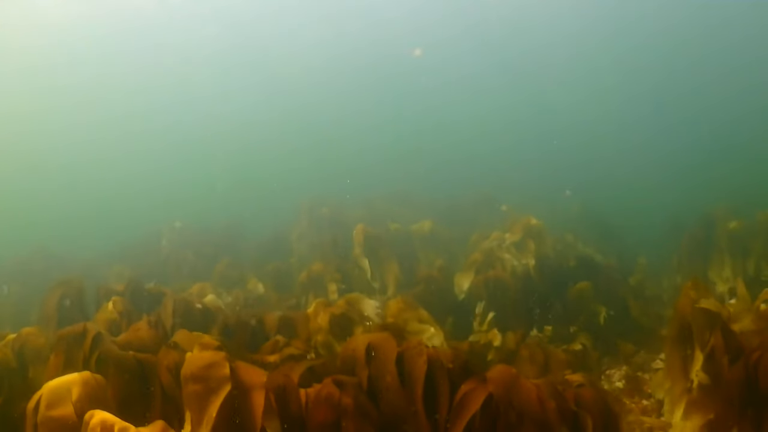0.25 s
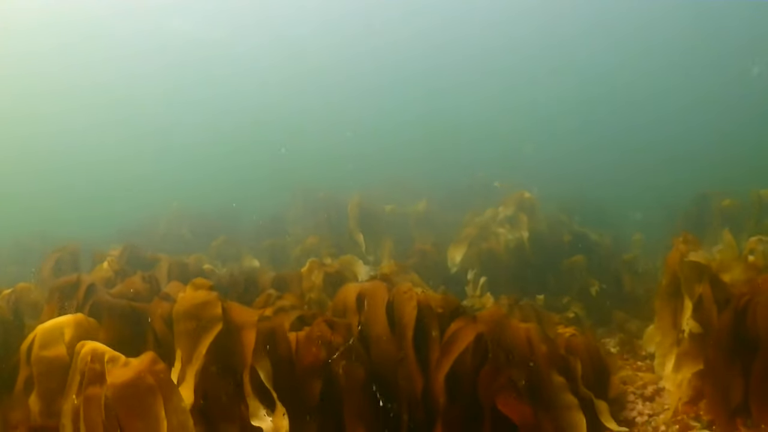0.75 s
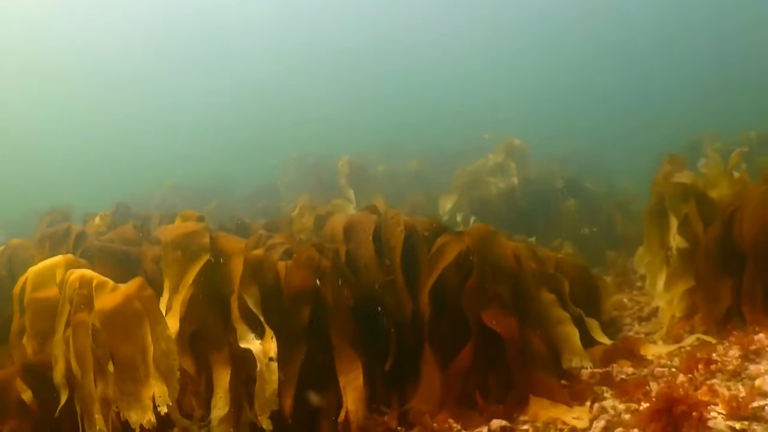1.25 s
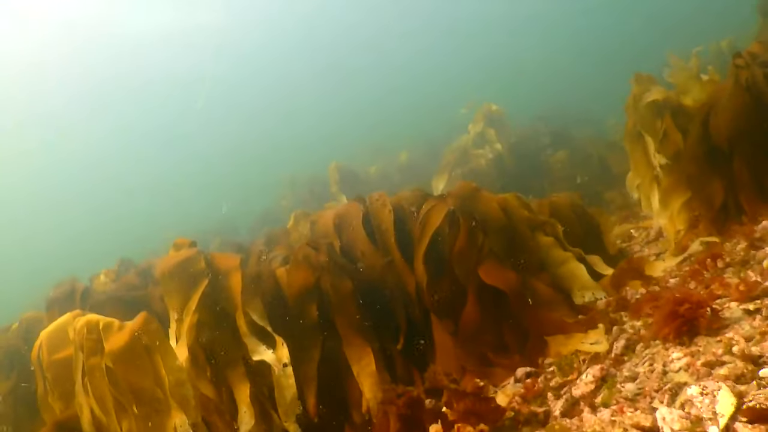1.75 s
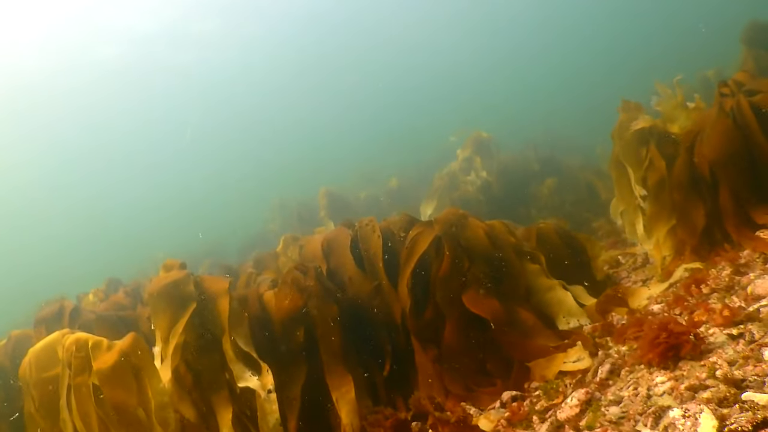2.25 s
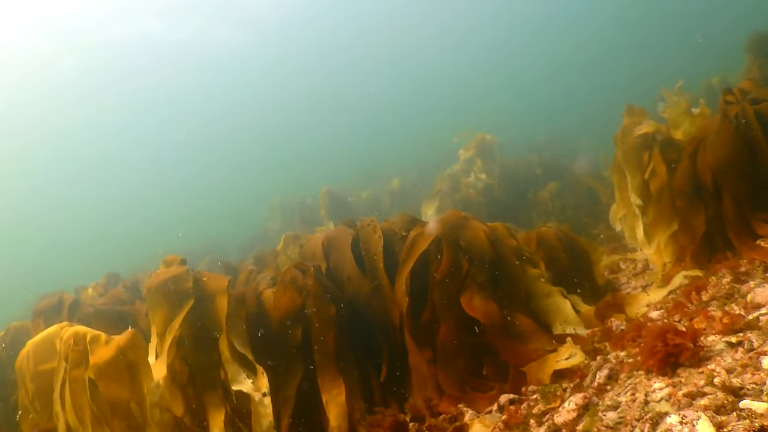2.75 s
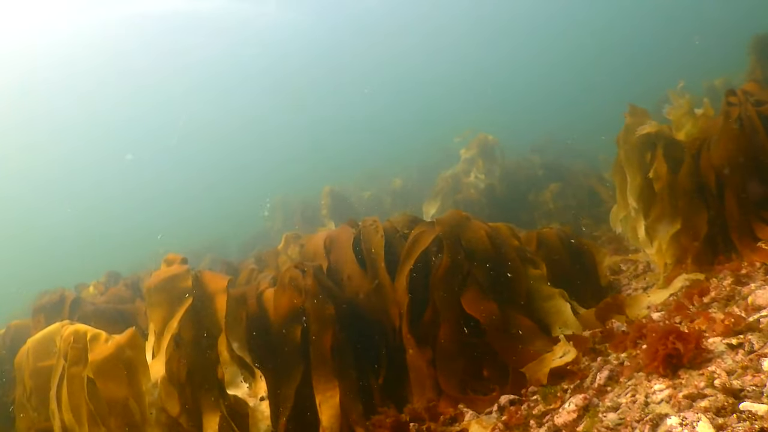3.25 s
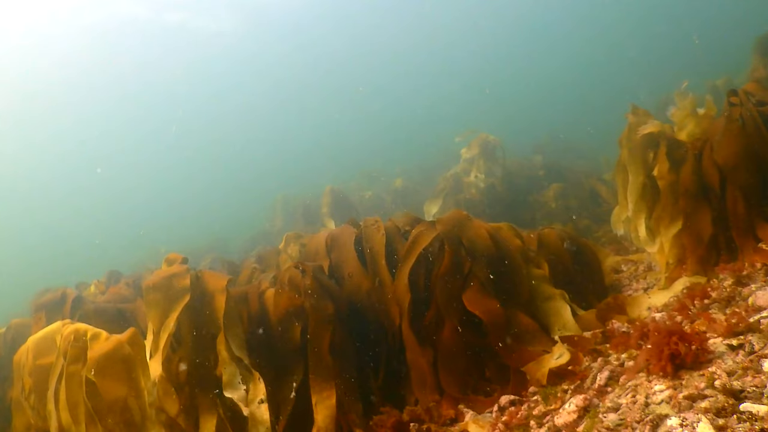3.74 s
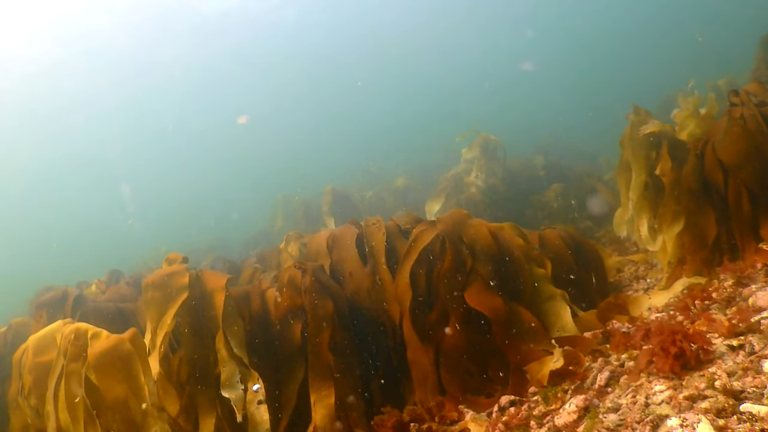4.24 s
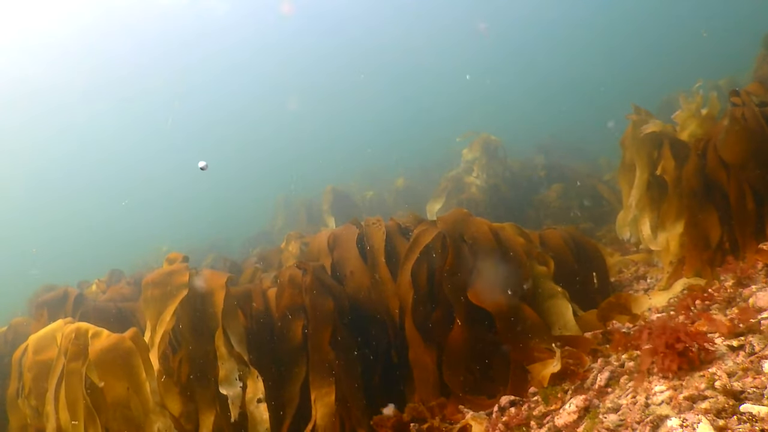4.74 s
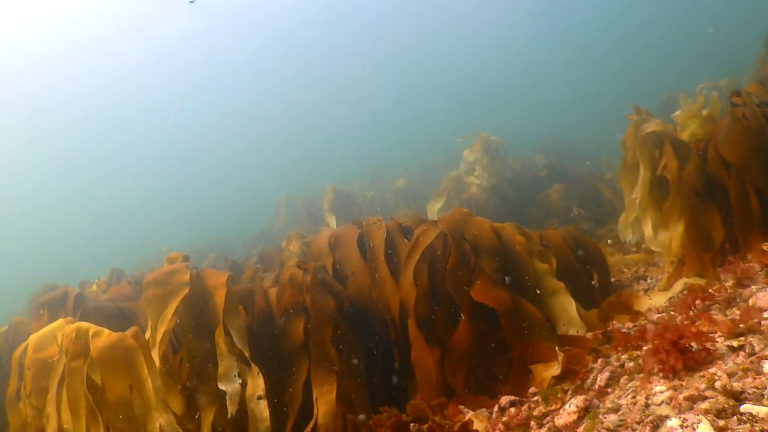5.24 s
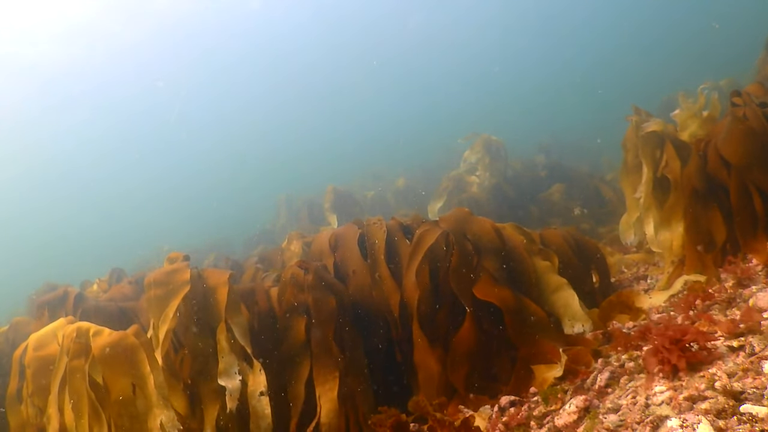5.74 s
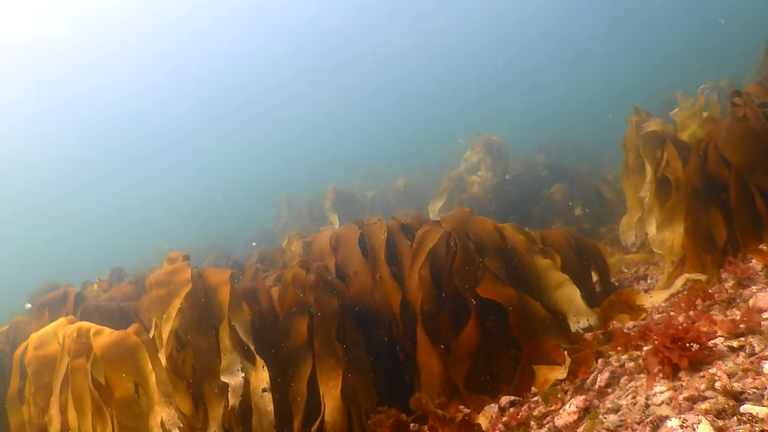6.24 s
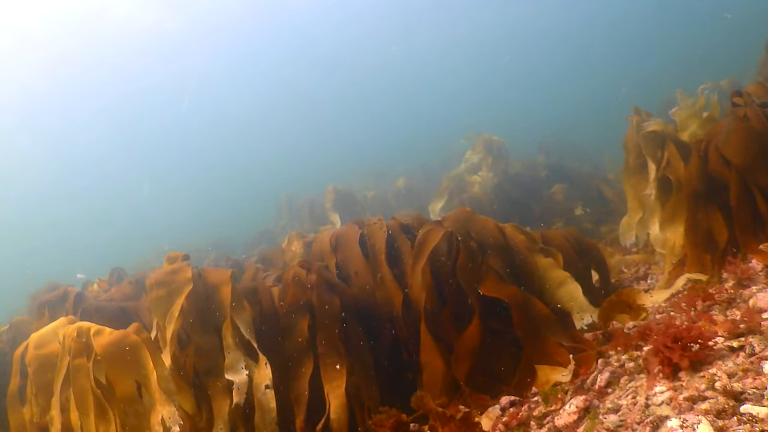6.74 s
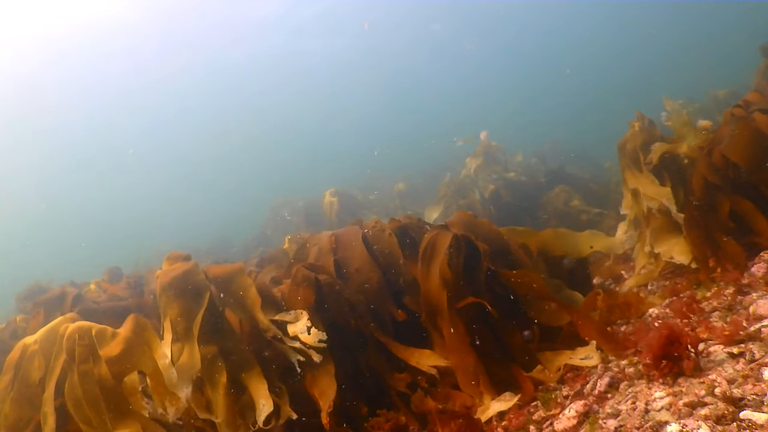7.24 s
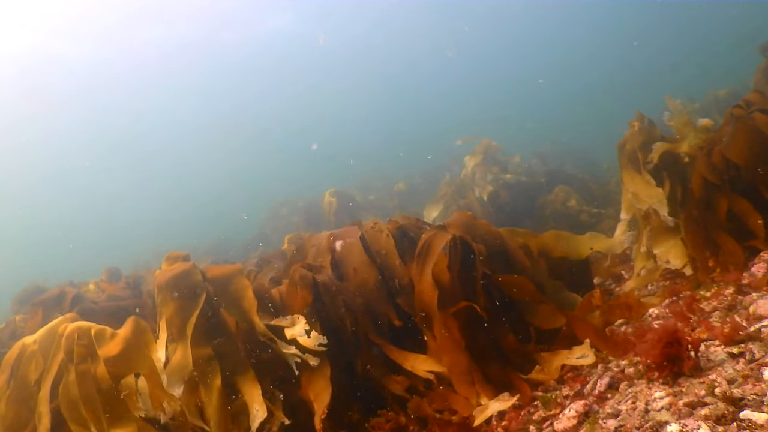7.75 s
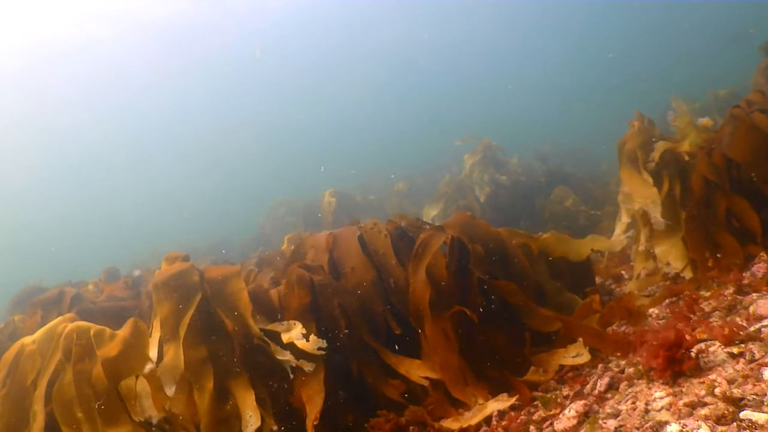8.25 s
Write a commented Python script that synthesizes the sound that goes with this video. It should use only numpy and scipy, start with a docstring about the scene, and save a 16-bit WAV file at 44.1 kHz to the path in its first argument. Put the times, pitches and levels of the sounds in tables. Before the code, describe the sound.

A boat engine is heard underwater from the start, thumping about seven times a second over a clattering drone, with two shrill rasps per beat and a very faint, thin whine. Scattered dull knocks and bubbles sound close to the microphone housing. At about 1.9 seconds a cluster of knocks and a booming bump end in a very loud, sharp click at 2 seconds. Everything ducks, then swells back over the next two seconds. The engine carries on with somewhat stronger thumps, occasional knocks and bright ticks, and a low surge of water around 4.2 seconds. Just before 7 seconds the sound drops to silence for a tenth of a second. It returns without the engine: quieter water gurgles, ticks and crackles close by over faint hiss until about 8.5 seconds. The left side carries the detail; the right is muffled, mostly bass.

```python
"""A boat engine heard under water, from a camera in a sealed housing above a kelp bed.
It thumps seven times a second over a clattering drone, with two shrill rasps a cycle and a thin whine.
Right at the microphones, knocks and a booming bump on the housing end in a sharp click that ducks
the gain for two seconds. After a short silence the engine is gone: water gurgles and ticks close by.
The left microphone hears it all; the right one is muffled and gets little but the bass."""
import sys
import numpy as np
from scipy import signal
from scipy.fft import rfft, irfft
from scipy.io import wavfile

SR = 44100
rng = np.random.default_rng(int(sys.argv[2]) if len(sys.argv) > 2 else 0)


def persist_wave(psi):
    """Save psi, clipped to +-1, as 16-bit WAV."""
    counts = np.round(np.clip(psi, -1, 1) * 32767).astype(np.int16)
    wavfile.write(sys.argv[1], SR, np.atleast_2d(counts).T)


N = 374409
TIME = np.arange(N) / SR
HZ = np.fft.rfftfreq(N, 1 / SR)
FIRST_STROKE_S, CYCLE_S, ENGINE_GONE_S = 0.0865, 0.14115, 7.0
BAND_LIMIT_HZ = 15550

# What the engine's heavy stroke rings. Each row: pitch in Hz, gain in dB, seconds to fall 60 dB.
THUMP_MODES = [(265, -18, .07), (328, -4, .085), (445, -5.5, .05), (630, -3, .04), (1050, -10, .015)]
# How strongly the thumps come through the water. Each row: time in seconds, relative level in dB.
THUMP_LEVELS = [(0.1, -27.5), (0.7, -27.5), (1.1, -23), (2.3, -24.5), (2.7, -21), (3.55, -18), (4.0, -18.5),
                (4.35, -16.5), (5.0, -21), (5.85, -19.5), (6.8, -22)]
# The idle wavers, so strokes come early or late. Each row: time in seconds, delay in seconds.
STROKE_DELAYS = [(0.3, 0), (0.9, 0), (1.2, -.0048), (1.5, .0007), (1.8, 0), (2.06, -.005), (2.35, .001),
                 (2.9, .0035), (3.45, 0), (3.65, -.0044), (4.04, -.0024), (4.2, .0035), (4.6, .0027),
                 (5.03, -.002), (5.3, .002), (5.9, 0), (6.25, -.0035), (6.75, .0014)]
# Resonances of the rasp. Each row: centre in Hz, width in Hz, gain in dB, change in dB at full surge.
RASP_MODES = [(2010, 1900, -8, 3.5), (3135, 85, 0, 8), (3305, 73, -2.5, 7), (3428, 51, 6, -6),
              (3630, 194, 2.5, -4), (3910, 610, -4, -12), (4280, 71, -1.5, -2), (4500, 620, -8.5, -3)]
# How strongly the rasps reach the camera. Each row: time in seconds, relative level in dB.
RASP_LEVELS = [(0.2, -34), (1.2, -35), (3.3, -34.5), (4.1, -37), (5.5, -36.5), (6.8, -38)]
# Housing resonances that colour the drone. Each row: centre in Hz, width in Hz, then gain in dB
# at first, near the kelp, once the camera has turned, and with the engine gone.
HOUSING_MODES = [(335.8, 30, -8, -6.5, 2, -6), (484, 100, -12.5, -6.5, -2.5, -19), (562, 91, 0, -2, 0.5, 6),
                 (692, 71, -2, -11.5, -0.5, 6.5), (820, 200, -9.5, -6.5, -11.5, -2.5),
                 (1022.6, 115, -6.5, 2.5, 0.5, 0.5), (1092, 61, -3, -2, 2, -1),
                 (1176, 110, -3.5, -4.5, -2.5, -17), (1360, 78, -23, -20.5, -8.5, -9),
                 (1511, 150, -9.5, -11.5, -2.5, -3), (1706, 350, -18, -17, -11.5, -11.5),
                 (2195, 54, -11.5, -12, -12, -9), (2406, 480, -20, -20.5, -20, -20),
                 (3480, 1140, -18, -19, -18.5, -15.5), (4130, 380, -18.5, -24, -18.5, -11.5),
                 (5120, 960, -23.5, -24.5, -21.5, -16)]
# The drone, a faint wash once the engine is gone. Each row: time in seconds, relative level in dB.
DRONE_LEVELS = [(0, -32.5), (0.9, -32), (1.3, -31), (2.2, -28), (2.8, -31.5), (3.6, -30), (4.8, -31.5),
                (6.93, -32.5), (7.05, -43), (8.45, -45.5)]
# Dull knocks and gurgles on the housing.
# Each row: start in seconds, peak in dB, centre in Hz, length of the scatter in seconds.
HOUSING_KNOCKS = [(0.471, -10.5, 1100, 0.0017), (0.594, -14, 900, 0.001), (0.618, -16, 520, 0.0075),
                  (0.955, -17, 1400, 0.0013), (1.256, -17, 1300, 0.0011), (1.289, -19, 1030, 0.001),
                  (1.33, -21, 1010, 0.011), (1.366, -19, 1050, 0.005), (1.585, -15.5, 1060, 0.0041),
                  (1.886, -15, 1200, 0.0057), (1.912, -6, 1030, 0.0084), (1.937, -16, 1200, 0.008),
                  (1.95, -15, 1300, 0.014), (1.995, -0.5, 2400, 0.003), (2.566, -12, 835, 0.0026),
                  (4.104, -13.5, 670, 0.0046), (4.122, -22.5, 650, 0.023), (4.401, -18, 564, 0.0089),
                  (4.506, -22, 280, 0.0081), (5.247, -16, 716, 0.0017), (6.434, -19, 680, 0.0027),
                  (6.481, -10, 1030, 0.0022), (7.052, -28, 990, 0.0065), (7.101, -23.5, 536, 0.0185),
                  (7.167, -24, 647, 0.002), (7.233, -33, 890, 0.019), (7.289, -24, 860, 0.022),
                  (7.453, -27.5, 814, 0.013), (7.479, -27.5, 650, 0.012), (7.54, -23, 557, 0.0061),
                  (7.571, -24.5, 760, 0.006), (7.638, -35, 397, 0.0041), (7.676, -29, 700, 0.002),
                  (7.764, -35, 650, 0.002), (7.687, -16, 700, 0.02), (7.813, -27.5, 825, 0.022),
                  (7.881, -28.5, 750, 0.024), (8.053, -27, 668, 0.001), (8.076, -24.5, 850, 0.0066),
                  (8.129, -27, 830, 0.019), (8.17, -18, 614, 0.018), (8.334, -27, 815, 0.0027),
                  (8.383, -25, 760, 0.004), (8.399, -25, 700, 0.016)]
# What knocks and gurgles ring. Each row: centre in Hz, width in Hz, gain in dB.
KNOCK_RESONANCES = [(88, 27, -35), (147, 63, -4), (251, 110, -2), (347, 61.5, 6), (443.4, 130, 5),
                    (707, 180, 3.5), (895, 118, -6), (1045, 270, -1.5), (1396, 350, -3.5),
                    (2390, 1300, -23)]
# The housing's lowest resonances. Each row: centre in Hz, width in Hz, gain in dB.
BOOM_MODES = [(85, 18, 3), (132, 49, 2), (192, 48, -3.5), (286, 77, 4.5), (475, 110, -5.5)]
# The sharp click and its bounce. Each row: start in seconds, peak in dB ahead of the limiter.
CLICK_HITS = [(1.9772, 19.5), (1.98, 16.5)]
# What the click rings. Each row: centre in Hz, width in Hz, gain in dB.
CLICK_RESONANCES = [(427, 120, -10.5), (895, 180, 6.5), (1820, 2300, -19), (3080, 920, -13.5),
                    (3730, 480, -23)]
# Single bubbles. Each row: time of the peak in seconds, peak in dB, pitch in Hz, swell in seconds.
BUBBLE_NOTES = [(0.037, -22.5, 1120, 0.0026), (0.471, -16.5, 1130, 0.0023), (0.621, -26, 407, .004),
                (0.655, -29.5, 430, 0.0038), (0.85, -23, 1114, 0.009), (1.337, -21.5, 1080, 0.012),
                (1.374, -22, 960, .005), (1.901, -11.5, 1080, 0.0017), (1.932, -8, 1060, 0.0016),
                (1.9525, -7, 1380, 0.0016), (2.042, -9.5, 1040, .002), (4.447, -16, 244, .003),
                (5.366, -16, 700, 0.0018), (5.421, -18.5, 690, 0.0018), (5.527, -21, 690, 0.0031),
                (5.944, -16, 290, 0.0023), (7.31, -29, 721, 0.0055), (8.333, -30, 1430, 0.0012),
                (8.405, -28.5, 715, 0.0064)]
# Bright ticks in the water.
# Each row: start in seconds, relative level in dB, centre in Hz, length of the scatter in seconds.
WATER_TICKS = [(0.253, -16.5, 3080, 0.0043), (0.481, -15, 4470, 0.0011), (2.171, -19.5, 5200, 0.0024),
               (2.499, -7.5, 3020, 0.0067), (3.455, -14.5, 5200, 0.0012), (3.52, -17, 3000, 0.0072),
               (3.648, -22, 6500, 0.001), (3.804, -22, 4500, 0.001), (3.913, -21.5, 4000, 0.0026),
               (4.099, -19, 4870, 0.012), (4.275, -16.5, 3400, 0.0028), (4.442, -21, 2500, 0.002),
               (4.675, -20, 3500, 0.0016), (5.247, -15.5, 5000, 0.0022), (5.367, -20.5, 4000, 0.0012),
               (5.433, -20, 4800, 0.0022), (5.939, -15, 3120, 0.0094), (6.337, -24, 6500, 0.0011),
               (6.429, -22, 4200, 0.0011), (6.5864, -16.5, 5500, 0.0018), (6.636, -17.5, 6000, 0.00087),
               (7.332, -29, 5200, 0.002), (7.477, -30, 2500, 0.0071), (7.54, -25, 2400, 0.0046),
               (7.577, -29, 1790, 0.0028), (7.693, -27, 2130, 0.019), (7.971, -27.5, 3520, 0.0035),
               (7.984, -35, 2800, 0.011), (8.076, -24, 3400, 0.006), (8.123, -31.5, 5000, 0.021),
               (8.185, -25, 2250, 0.0052), (8.332, -33, 5000, 0.002), (8.381, -33, 3800, 0.0096),
               (8.407, -27.5, 3420, 0.011)]
# The body of a tick. Each row: centre in Hz, width in Hz, gain in dB.
TICK_MODES = [(1550, 590, 9), (2680, 570, 4), (3720, 1400, -1.5), (4640, 1900, 1.5)]
# The thin spike at the front of a near tick. Each row: centre in Hz, width in Hz, gain in dB.
SPIKE_MODES = [(7500, 3000, 0.5), (11000, 7000, -4)]
# Resonances of the water's rumble. Each row: centre in Hz, width in Hz, gain in dB.
RUMBLE_MODES = [(91.7, 22, -27), (133, 28, -5), (194.4, 36.5, 1.5), (288, 167, -1)]
# Steady push of water on the housing. Each row: time in seconds, level in dB.
RUMBLE_LEVELS = [(0, -43.5), (1.7, -41), (3.5, -46.5), (6.93, -48.5), (7.05, -59.5), (8.45, -59)]
# Surges against the housing. Each row: time of the crest in seconds, level in dB, half length in seconds.
WATER_SURGES = [(1.414, -38.5, 0.091), (1.932, -25.5, 0.02), (2.175, -30.5, 0.14), (4.2, -37, 0.1),
                (4.487, -38.5, 0.17), (7.702, -43, 0.028)]
# Hiss of the microphones. Each row: frequency in Hz, relative density in dB.
HISS_SPECTRUM = [(25, 2.5), (100, 11), (500, 13), (1000, 12.5), (2000, 5.5), (3100, 2.5), (3800, -3),
                 (5200, -3), (6400, 1.5), (7800, -3), (12000, 1.5), (15000, -1.5)]
# The muffled right microphone. Each row: frequency in Hz, dB against the left, lag in radians.
RIGHT_MIC = [(89, -9.5, 0.22), (140, -3.5, 0.15), (165, 0.5, 0.1), (206, -4.5, 0.05), (333, 0.5, 0.34),
             (382, 3.5, 1.04), (461, -0.5, 2.2), (474, 1.5, 2.24), (560, -8, 2.56), (680, -20.5, 0.63),
             (1040, -34, 4.2), (4980, -26, 5.1)]
# The sound fades to silence and comes back. Each row: time in seconds, gain in dB.
PAUSE_GAIN = [(6.93, 0), (6.944, -10), (6.966, -56), (7.047, -56), (7.049, 0)]


def thumps(level_db=2, uneven_db=1.0, attack_s=.0038):
    """The engine's heavy stroke rings low resonances through the water, a little differently each time."""
    out, t = np.zeros(N), np.arange(SR // 8) / SR
    attack = 1 - np.exp(-(t / attack_s) ** 2)
    for s, db in strokes(THUMP_LEVELS, uneven_db):
        detune = .012 * rng.standard_normal(len(THUMP_MODES))
        colour_db = 1.1 * rng.standard_normal(len(THUMP_MODES))
        thump = np.zeros(len(t))
        for k, (hz, mode_db, t60) in enumerate(THUMP_MODES):
            decay = amp(mode_db + colour_db[k]) * 1000 ** (-t / t60)
            thump += (-1) ** k * decay * np.sin(2 * np.pi * hz * (1 + detune[k]) * t)
        add(out, s, amp(db + level_db) * blow(attack * thump, length=.005, scatter=.22))
    return out


def strokes(levels, uneven_db):
    """Time and level of each engine cycle: nearly even, and already running at the start."""
    s = np.arange(FIRST_STROKE_S - CYCLE_S, ENGINE_GONE_S, CYCLE_S)
    return zip(s + curve(STROKE_DELAYS, s), curve(levels, s) + uneven_db * rng.standard_normal(len(s)))


def rasps(first_s=0.028, second_s=0.0967, second_db=-1.5, lead_s_per_khz=0.0046, level_db=1.95):
    """Twice a cycle the machinery rasps; the highest resonance sounds first, so each rasp falls a little."""
    swell = np.zeros(N)
    t = np.arange(SR // 5) / SR - .1
    for s, db in strokes(RASP_LEVELS, uneven_db=-0.5):
        for delay, stroke_db in ((first_s, 0), (second_s, second_db)):
            width_s, slip_s = rng.uniform(.012, .0135), rng.uniform(-.001, .001)
            add(swell, s + t[0] + delay + slip_s, amp(db + stroke_db) * np.exp(-.5 * (t / width_s) ** 2))
    # the rubbing catches unevenly and chatters a few hundred times a second
    swell *= amp(.8 * wander(120))
    chatter = 1 + .6 * np.cos(phase(335 + 25 * wander(30)))
    # each resonance waxes and wanes by itself; the low ones ring out while the water surges
    surge = bell(s=4.19, half_s=0.18)
    whole = np.linalg.norm(resonances([mode[:3] for mode in RASP_MODES], HZ))
    out = np.zeros(N)
    for hz, width, db, surge_db in RASP_MODES:
        gain = resonances([(hz, width, db)], HZ)
        share = np.linalg.norm(gain) / whole
        lead_s = lead_s_per_khz * (hz - 3500) / 1000
        band = coloured(chatter * rng.standard_normal(N), gain)
        band *= amp(surge_db * surge + .7 * wander(5))
        out += share * band * np.interp(TIME + lead_s, TIME, swell)
    return amp(level_db) * out


def drone(level_db=1):
    """Dense uneven clatter rings the housing; the colour shifts as the camera nears the kelp and turns."""
    hz, width, *colours = np.transpose(HOUSING_MODES)
    clatter = rng.standard_normal(N) * amp(1.7 * wander(300) + .6 * wander(15))
    near = np.interp(TIME, [0.55, 0.9], [0, 1])
    turned = np.interp(TIME, [1.8, 3.4], [0, 1])
    gone = (TIME > ENGINE_GONE_S) * 1.
    shares = [1 - near, near - turned, turned * (1 - gone), gone]
    body = sum(share * coloured(clatter, resonances(zip(hz, width, db), HZ))
               for share, db in zip(shares, colours))
    return body * amp(level_db + curve(DRONE_LEVELS))


def knock(db, centre_hz, length):
    """One knock or gurgle rings the resonances nearest its centre most; a long one is many contacts."""
    response = ring(centred(KNOCK_RESONANCES, centre_hz))
    return amp(db) * blow(response, length, scatter=(length / .006) ** 2)


def knocks():
    """The knocks and gurgles that stand out, right on the housing."""
    out = np.zeros(N)
    for s, db, centre_hz, length in HOUSING_KNOCKS:
        add(out, s, knock(db, centre_hz, length))
    return out


def bump(s=1.9125, level_db=-10.5, bounce_s=0.0038, bounce=0.65):
    """Just before the click something heavy and soft bumps the housing twice in quick succession."""
    boom, out = ring(BOOM_MODES), np.zeros(N)
    boom = amp(level_db) * boom / abs(boom).max()
    add(out, s, boom)
    add(out, s + bounce_s, bounce * boom)
    return out


def judder(peak_db=-18.5, pitch_hz=135, waver=0.1):
    """Around the bump the housing judders from side to side with a short low groan."""
    groan = np.sin(phase(pitch_hz * (1 + waver * wander(60))))
    return amp(peak_db) * bell(s=1.936, half_s=0.029) * groan


def click():
    """A hard snap on the housing itself, far louder at the microphones than anything in the water."""
    snap, out = ring(CLICK_RESONANCES), np.zeros(N)
    for s, db in CLICK_HITS:
        add(out, s, amp(db) * snap / abs(snap).max())
    return out


def bubbles(rise_per_s=2.3):
    """Each bubble swells, rings at one slightly rising pitch and dies away."""
    out, t = np.zeros(N), np.arange(-SR // 50, SR // 12) / SR
    for s, db, hz, swell_s in BUBBLE_NOTES:
        envelope = np.exp(1 - t / swell_s - np.exp(-t / swell_s))
        note = np.sin(2 * np.pi * hz * t * (1 + rise_per_s * t / 2))
        add(out, s + t[0], amp(db) * envelope * note)
    return out


def ticks(level_db=-2, wall_hz=5500, spike_db=-15, spike_db_per_octave=14):
    """Small snaps smeared by scatter from the sea bed; the thinner the snap, the stronger its spike."""
    out, spike = np.zeros(N), ring(SPIKE_MODES, BAND_LIMIT_HZ)
    for s, db, centre_hz, length in WATER_TICKS:
        body = ring(centred(TICK_MODES, centre_hz), wall_hz)
        scatter = length / 0.0019
        brightness = amp(spike_db + spike_db_per_octave * np.log2(centre_hz / wall_hz))
        tick = blow(body, length, scatter) + brightness * blow(spike, length, scatter)
        add(out, s, amp(db + level_db) * tick)
    return out


def gurgles(count=48, level_db=-32, running_db=4, spread_db=4.5, centre_hz=900, length_s=0.0063):
    """Small gurgles come at random against the housing, stronger while the engine runs."""
    out = np.zeros(N)
    for k, (place, size, pitch, span) in enumerate(rng.uniform(-1.1, 1, (count, 4))):
        s = (k + .5 + place / 2) * N / SR / count
        db = level_db + running_db * (s < ENGINE_GONE_S) + spread_db * size
        add(out, s, knock(db, centre_hz * 2 ** (0.18 * pitch), length_s * 2 ** span))
    return out


def rumble(lump_db=3):
    """Water pushes on the housing in low lumps; each surge swells and ebbs."""
    steady_power = amp(curve(RUMBLE_LEVELS)) ** 2
    surge_power = sum(amp(db) ** 2 * bell(s, half_s) for s, db, half_s in WATER_SURGES)
    lumps = rng.standard_normal(N) * amp(lump_db * wander(37.5))
    return coloured(lumps, resonances(RUMBLE_MODES, HZ)) * np.sqrt(steady_power + surge_power)


def crackle(level_db=-44, pop_db=4, running_db=3.0):
    """Countless faint snaps and pops from the kelp bed below, louder while the engine runs."""
    snaps = shower(ring(TICK_MODES), per_s=90, length=.0015, scatter=.8)
    pops = shower(ring(KNOCK_RESONANCES[4:9]), per_s=90, length=.0015, scatter=.8)
    return amp(level_db + running_db * (TIME < ENGINE_GONE_S)) * (snaps + amp(pop_db) * pops)


def fizz(level_db=-53):
    """Tiny bright snaps prickle just above the hiss."""
    return amp(level_db) * shower(ring(SPIKE_MODES, BAND_LIMIT_HZ), per_s=45, length=.001, scatter=1)


def whine(pitch_hz=5094, level_db=-62, waver_hz=2, later_db=-5):
    """A thin steady whine, most likely the camera's own; it is fainter after the silence."""
    tone = np.sin(phase(pitch_hz + waver_hz * wander(11)))
    return amp(level_db + later_db * (TIME > ENGINE_GONE_S)) * tone


def hiss(level_db=-50.0, waver_db=0.87, later_db=-1):
    """Each microphone has its own wavering hiss, a touch lower after the silence."""
    gain = amp(spectrum(HISS_SPECTRUM))
    pair = [coloured(noise, gain) * amp(waver_db * wander(17)) for noise in rng.standard_normal((2, N))]
    return amp(level_db + later_db * (TIME > ENGINE_GONE_S)) * np.array(pair)


def amp(db):
    """Decibels as an amplitude."""
    return 10 ** (np.asarray(db) / 20)


def unit_rms(x):
    """The same sound at rms 1."""
    return x / np.sqrt(np.mean(x ** 2) + 1e-20)


def phase(hz):
    """Running phase of a changing pitch, in radians."""
    return 2 * np.pi * np.cumsum(hz) / SR


def bell(s, half_s):
    """A swell that reaches 1 at time s and is down to 1/e at half_s to either side."""
    return np.exp(-((TIME - s) / half_s) ** 2)


def curve(points, s=TIME):
    """Rows of time and value, read at the given times."""
    return np.interp(s, *np.transpose(points))


def spectrum(points, column=1):
    """One column of a spectrum table, read on a log-frequency axis."""
    points = np.array(points)
    return np.interp(np.log(HZ + 1), np.log(points[:, 0] + 1), points[:, column])


def add(mix, s, sound):
    """Mixes a sound in at a time, which may lie before the start."""
    start = round(s * SR)
    sound = sound[max(-start, 0):]
    part = mix[max(start, 0):][:len(sound)]
    part += sound[:len(part)]


def wander(rate_hz, size=16384):
    """Smooth random drift up to about a given rate, rms 1."""
    hz = np.fft.rfftfreq(size, N / SR / size)
    slow = irfft(rfft(rng.standard_normal(size)) * np.exp(-(hz / rate_hz) ** 2))
    return np.interp(TIME, np.linspace(0, N / SR, size), unit_rms(slow))


def resonances(modes, hz, wall_hz=5300, bass_hz=65):
    """Gain of steep resonances; the housing wall shuts out treble, the microphone the deepest bass."""
    power = sum((amp(db) / (1 + (2 * (hz - f) / width) ** 2)) ** 2 for f, width, db in modes)
    return np.sqrt(power / (1 + (hz / wall_hz) ** 26) / (1 + (bass_hz / (hz + 1)) ** 4))


def centred(modes, centre_hz, fall_db_per_octave=9):
    """The same resonances, weaker the further they lie from a centre."""
    return [(hz, width, db - fall_db_per_octave * abs(np.log2(hz / centre_hz))) for hz, width, db in modes]


def coloured(x, gain):
    """A steady sound given a spectrum, at rms 1."""
    return unit_rms(irfft(rfft(x) * gain, N))


def ring(modes, wall_hz=5300):
    """Minimum-phase impulse response of a set of resonances."""
    gain = resonances(modes, np.fft.rfftfreq(4096, 1 / SR), wall_hz)
    log_gain = np.log(np.maximum(gain / gain.max(), 1e-5))
    mirrored = np.concatenate([log_gain, log_gain[-2:0:-1]])
    return np.fft.ifft(np.exp(np.conj(signal.hilbert(mirrored)))).real


def blow(response, length, scatter):
    """A first contact and a scatter of later ones, over about length seconds, ring a response; peak 1."""
    age = np.arange(len(response)) / SR / max(length, 1 / SR)
    contacts = rng.standard_normal(len(age)) * age * np.exp(-2 * age)
    contacts = scatter * contacts / np.linalg.norm(contacts)
    contacts[0] += 1
    sound = signal.fftconvolve(contacts, response)[:len(age)]
    return sound / abs(sound).max()


def shower(response, per_s, length, scatter, spread_db=3.5):
    """One blow repeated at random times and strengths; a few stand out."""
    sizes = amp(spread_db * np.minimum(rng.exponential(1, N), 3))
    hits = rng.random(N) < per_s / SR
    return signal.oaconvolve(sizes * hits, blow(response, length, scatter))[:N]


def scene(right_rumble_db=-9):
    """Two microphones in the housing, the right one muffled; the judder pushes them in opposite ways."""
    left = thumps() + rasps() + drone() + rumble() + whine()
    left += knocks() + bubbles() + gurgles() + ticks() + crackle() + fizz() + bump() + click()
    muffling = amp(spectrum(RIGHT_MIC)) * np.exp(-1j * spectrum(RIGHT_MIC, column=2))
    right = irfft(rfft(left) * muffling, N) + amp(right_rumble_db) * rumble()
    rocking = judder()
    return np.array([left + rocking, right - rocking]) + hiss()


def record(dry, recovery_db_per_s=10, attack_s=0.001, ceiling=.78, notch_hz=6450, notch_width_hz=1300):
    """The camera's limiter ducks fast and recovers slowly; then a treble notch, pause and band limit."""
    over_db = np.maximum(20 * np.log10(abs(dry).max(0) + 1e-9), 0)
    recovery = recovery_db_per_s * TIME
    duck_db = np.maximum.accumulate(over_db + recovery) - recovery
    pole = np.exp(-1 / (attack_s * SR))
    duck_db = signal.lfilter([1 - pole], [1, -pole], duck_db)
    out = np.clip(dry * amp(-duck_db), -ceiling, ceiling)  # what slips past the limiter clips
    out = signal.lfilter(*signal.iirnotch(notch_hz, notch_hz / notch_width_hz, SR), out)
    out *= amp(curve(PAUSE_GAIN))
    lowpass = signal.firwin(511, BAND_LIMIT_HZ, window=("kaiser", 9), fs=SR)
    return signal.oaconvolve(out, lowpass[None], "same")


dry = scene()
out = record(dry)
persist_wave(out)
```